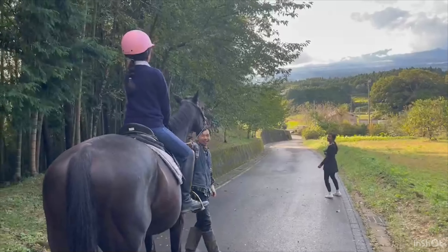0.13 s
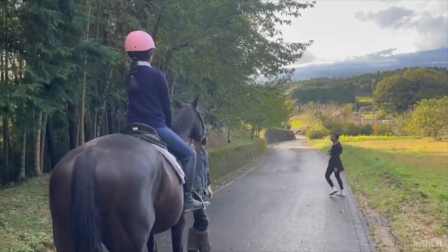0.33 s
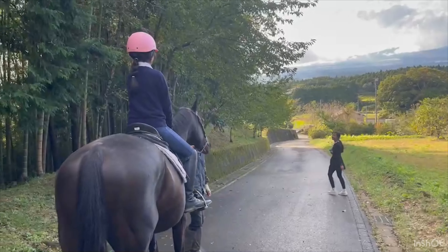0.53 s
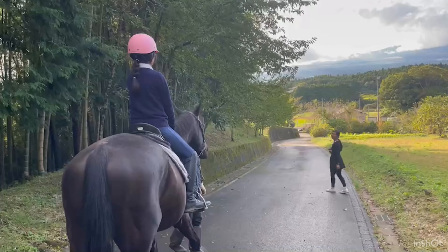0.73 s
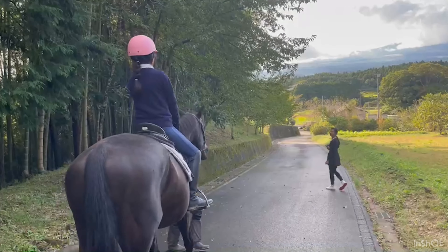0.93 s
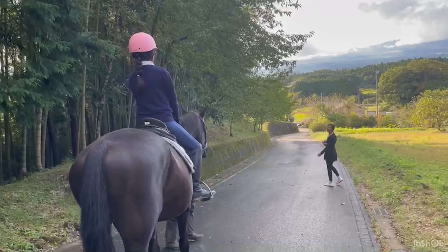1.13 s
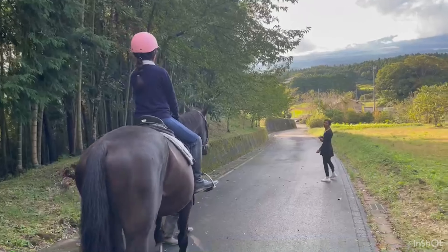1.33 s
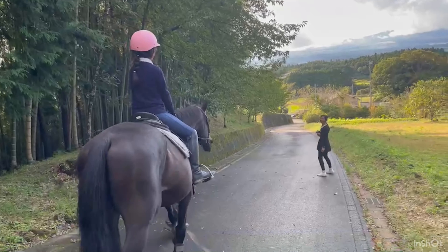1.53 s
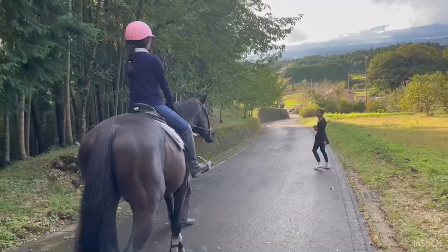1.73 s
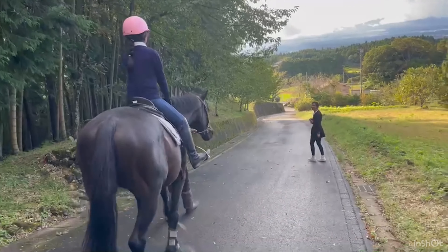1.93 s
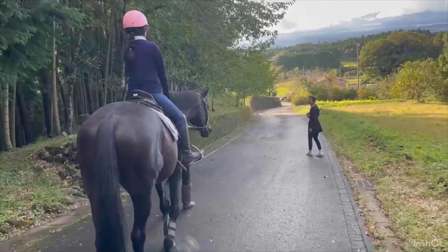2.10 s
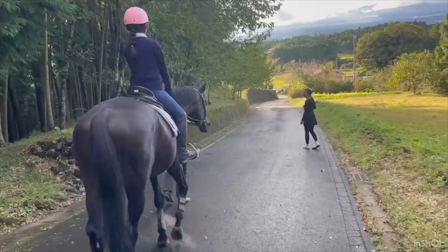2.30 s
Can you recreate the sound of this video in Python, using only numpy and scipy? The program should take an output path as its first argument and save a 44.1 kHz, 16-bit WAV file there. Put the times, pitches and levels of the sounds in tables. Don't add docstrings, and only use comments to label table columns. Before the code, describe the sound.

Shod horse hooves clip-clop at a walk on wet tarmac, with iron ticks and faint birdsong

```python
import sys
import numpy as np
from scipy import signal
from scipy.fft import rfft, irfft
from scipy.io import wavfile
from scipy.ndimage import uniform_filter1d

SR = 44100
rng = np.random.default_rng(int(sys.argv[2]) if len(sys.argv) > 2 else 0)


def master_out(mix):
    frames = np.transpose(np.atleast_2d(mix))
    ceiling = np.clip(frames, -1, 1)
    pcm = np.round(ceiling * 32767).astype(np.int16)
    wavfile.write(sys.argv[1], SR, pcm)


def decibels_to_gain(level_db):
    exponent = np.asarray(level_db, float) / 20
    return 10 ** exponent


N = 104120
HZ = np.fft.rfftfreq(N, 1 / SR)
SPRAY_HZ = 9440


def shape(table):
    hz, value = np.array(table, float).T
    return np.interp(np.log(HZ + 1), np.log(hz), value)


def unit(x):
    return x / np.sqrt(np.mean(x ** 2) + 1e-18)


def band(x, hz, width_hz):
    f = np.fft.rfftfreq(len(x), 1 / SR)
    bell = np.exp(-.5 * ((f - hz) / width_hz) ** 2)
    return irfft(rfft(x) * bell, len(x))


def walk(rate_hz):
    k = int(SR / rate_hz)
    stairs = np.repeat(rng.standard_normal(N // k + 1), k)
    smooth = uniform_filter1d(uniform_filter1d(stairs, k), k)
    return unit(smooth[:N])


def add(out, start_s, x, peak_db):
    i = max(int(start_s * SR), 0)
    x = x[:N - i]
    out[i:i + len(x)] += x * decibels_to_gain(peak_db) / np.max(np.abs(x))


def swell(t, rise_s, fall_s):
    return (1 - np.exp(-t / rise_s)) ** 2 * np.exp(-t / fall_s)


def decay(t, t60_s):
    return np.exp(-np.log(1000) * t / t60_s)


# (frequency [Hz], likeness [0-1])
ALIKE = [(60, .83), (300, .85), (700, .62), (2000, .2), (4500, .6), (6500, .9), (8000, .995), (15000, .995)]


def air(table, flicker_db=1.8, top_hz=14800):
    alike = np.clip(shape(ALIKE), 0, 1)
    noise = rfft(rng.standard_normal((2, N))) * decibels_to_gain(shape(table))
    mid, side = noise * np.sqrt([1 + alike, 1 - alike])
    pair = np.array([mid + side, mid - side]) / np.sqrt(1 + (HZ / top_hz) ** 20)
    out = np.zeros((2, N))
    for hz in 16 * 2. ** np.arange(11):
        octave = np.clip(1 - np.abs(np.log2((HZ + 1) / hz)), 0, 1)
        out += irfft(pair * octave, N) * decibels_to_gain(flicker_db * walk(6.09))
    return unit(out)


# (frequency [Hz], density [dB per Hz])
TRAFFIC = [(26, -19.5), (68, 3.5), (110, -4), (200, -7), (400, -17.5), (1000, -21.5), (5500, -37.5),
           (12500, -53)]


def traffic():
    return decibels_to_gain(-50) * air(TRAFFIC)


# (frequency [Hz], density [dB per Hz])
TREES = [(150, 1.5), (350, -2), (800, 3), (2000, -4), (4000, -18.5), (9000, -33)]
# (time [s], level [dB])
GUST = [
    (0, -87),
    (.55, -58),
    (1.2, -56.5),
    (1.6, -51),
    (1.95, -48),
    (2.36, -50.5),
]


def wind():
    time_s, level_db = np.array(GUST, float).T
    gust_db = np.interp(np.arange(N) / SR, time_s, level_db) - 1
    return decibels_to_gain(gust_db) * air(TREES)


# (time [s], length [s], level [dB], centre [Hz], spray level [dB])
SCUFFS = [
    (-.15, 0.31, -67.5, 5950, -73.5),
    (0.361, 0.033, -54.5, 6130, -54.5),
    (0.453, 0.16, -58.5, 6000, -64.5),
    (0.457, 0.053, -65, 6000, -80),
    (0.886, 0.047, -52.5, 2630, -63.5),
    (1.094, 0.048, -69, 4000, -68),
    (1.222, 0.026, -55.5, 3270, -58.5),
    (1.607, 0.13, -60.5, 2980, -71.5),
    (2.083, 0.046, -54, 2620, -66),
    (2.232, 0.075, -63.5, 3720, -65.5),
]


def scuffs():
    out, t = np.zeros(N), np.arange(N) / SR
    grain_db, slosh_db = 1.5, .5
    grains = rng.standard_normal((2, N)) * decibels_to_gain(grain_db * walk(300) + slosh_db * walk(40.2))
    spray = unit(band(grains[1], SPRAY_HZ, 3700))
    for start_s, length_s, db, hz, spray_db in SCUFFS:
        gate = np.sin(np.pi * np.clip((t - start_s) / length_s, 0, 1)) ** .7
        scrape = unit(band(grains[0], hz, 0.65 * hz))
        out += gate * (decibels_to_gain(db) * scrape + decibels_to_gain(spray_db) * spray)
    return out


def glide(table, voice):
    time_s, hz, db = np.array(table, float).T
    t = np.arange(N) / SR
    edge = np.clip(np.minimum(t - time_s[0], time_s[-1] - t) / 0.0029, 0, 1)
    carrier = np.exp(2j * np.pi * np.cumsum(np.interp(t, time_s, hz)) / SR)
    return np.sqrt(2) * np.real(carrier * voice) * decibels_to_gain(np.interp(t, time_s, db)) * edge


def flutter(hz):
    return (walk(2 * hz) + 1j * walk(2 * hz)) / np.sqrt(2)


# (time [s], pitch [Hz], level [dB])
CRICKET = [
    (0, 4700, -71),
    (.14, 4650, -74),
    (.22, 4660, -82),
]


def cricket():
    upper_ratio, upper_db = 1.245, -4
    upper = np.array(CRICKET) * [1, upper_ratio, 1] + [0, 0, upper_db]
    return glide(CRICKET, flutter(85)) + glide(upper, flutter(130))


# (time [s], pitch [Hz], level [dB])
CHIRP = [
    (.255, 3200, -64),
    (.285, 3560, -63),
    (.315, 3720, -60),
    (.34, 3600, -62),
    (.36, 3000, -63),
]


def chirp():
    return glide(CHIRP, 0.8 + 0.5 * flutter(140))


# (time [s], pitch [Hz], level [dB])
RASP = [
    (1.55, 3200, -66),
    (1.6, 3550, -70),
    (1.64, 4020, -65),
    (1.79, 4050, -68),
    (1.86, 4150, -73),
    (1.92, 4180, -65),
    (2.04, 4260, -60),
    (2.19, 4030, -62),
    (2.215, 3650, -63),
    (2.26, 3380, -65),
]
# (time [s], pitch [Hz], level [dB])
ANSWER = [
    (1.75, 4350, -68),
    (1.85, 4450, -63),
    (1.9, 4500, -74),
    (1.97, 4520, -62),
    (2.06, 4480, -59),
    (2.14, 4320, -65),
]


def rasp():
    wobble, patchy_db, width_hz = .008, 2, 150
    out = np.zeros(N)
    for strand in (RASP, ANSWER):
        waver = np.exp(2j * np.pi * np.cumsum(4000 * wobble * walk(30)) / SR)
        patches = decibels_to_gain(patchy_db * walk(25.24))
        out += glide(strand, flutter(width_hz) * waver * patches)
    return out


# (frequency [Hz], level [dB], T60 [s])
SHOE = [(2350, -10, .01), (3500, -12, .008), (5150, -11, .009), (6700, -18, .006)]
# (time [s], peak [dB], ring [Hz], spray level [dB])
TICKS = [(.351, -46, 3430, -63), (0.446, -56, 6280, -60), (.619, -49, 2700, -64), (0.658, -49.5, 3800, -59),
         (.82, -71, 5000, -68), (0.8401, -68, 5000, -52.5), (.863, -47, 3550, -62),
         (.872, -24.5, 2420, -38.5), (0.874, -25.5, 5250, -53), (.898, -37, 2430, -62),
         (.9025, -36.5, 3520, -62), (.906, -37, 2390, -66), (0.9095, -33.5, 2370, -53),
         (.943, -46, 5140, -54), (0.95, -44, 3730, -54), (1.042, -83, 6000, -78),
         (1.0722, -30, 2540, -38.5), (1.225, -48.5, 4870, -60), (1.2297, -34, 2570, -56),
         (1.246, -48, 4970, -67), (1.263, -68, 6000, -66), (1.327, -24, 2520, -69), (1.328, -40, 4200, -70),
         (1.353, -29.5, 4560, -70), (1.511, -58, 5060, -59.5), (1.5582, -73, 6300, -58),
         (1.625, -59, 6450, -62), (1.6787, -47.5, 6500, -67), (1.7505, -35.5, 5030, -49),
         (1.7866, -27, 5150, -52), (1.845, -70, 5000, -58), (1.905, -40.5, 5250, -64),
         (2.083, -30, 3600, -60), (2.0954, -33.5, 2320, -75), (2.2833, -42, 3580, -63)]


def ticks():
    out, t = np.zeros(N), np.arange(2048) / SR
    ring_t60_s, crack_s, crack_db = 0.0087, 0.0019, -11
    spray_s, spray_crest_db, spray_width_hz = 0.0013, 11.5, 5000
    scatter_db, scatter_ratio = 3, .04
    rattle = decibels_to_gain(-21) * swell(t, 0.003, 0.013)
    for start_s, db, ring_hz, spray_db in TICKS:
        strike, spit, grit = rng.standard_normal((3, len(t)))
        modes = np.sin(2 * np.pi * ring_hz * t) * decay(t, ring_t60_s)
        for hz, mode_db, t60_s in SHOE:
            level_draw, pitch_draw = rng.standard_normal(2)
            mode_hz = hz * (1 + scatter_ratio * pitch_draw)
            mode = np.sin(2 * np.pi * mode_hz * t) * decay(t, t60_s)
            modes += decibels_to_gain(mode_db + scatter_db * level_draw) * mode
        shoe = np.convolve(strike * swell(t, 0.000074, crack_s), modes)[:len(t)]
        crack = unit(band(grit, 1400, 3500)) * (swell(t, .0001, crack_s) + rattle)
        add(out, start_s, shoe / np.max(np.abs(shoe)) + decibels_to_gain(crack_db) * crack, db)
        spray = band(spit, SPRAY_HZ, spray_width_hz) * (swell(t, .0001, spray_s) + rattle)
        add(out, start_s, spray, spray_db + spray_crest_db)
    return out


# (time [s], peak [dB], pitch [Hz], fall [s])
CLOPS = [(.455, -47, 730, 0.0026), (.458, -45.5, 1042, 0.0048), (.8705, -22.5, 770, 0.0023),
         (.873, -18, 1023, 0.0024), (.884, -40, 1040, .003), (.895, -31.5, 686, 0.003),
         (.899, -32.5, 1130, 0.004), (.902, -29.5, 690, 0.003), (.909, -27, 981, 0.0045),
         (.915, -39, 977, 0.0049), (.942, -39, 1270, 0.00094), (.948, -35, 1010, 0.0011),
         (.957, -39.5, 786, 0.003), (1.0725, -40, 1057, 0.0027), (1.073, -32.5, 726, .002),
         (1.2235, -40, 706, 0.0012), (1.2305, -26, 896, 0.00078), (1.237, -40.5, 1096, 0.0027),
         (1.244, -42.5, 1020, 0.0015), (1.326, -20.5, 763, 0.0021), (1.3277, -12, 1065, .0016),
         (1.3335, -32, 1046, 0.0044), (1.351, -25, 1070, 0.0018), (1.353, -15.5, 684, 0.0012),
         (1.358, -26.5, 780, 0.0015), (1.369, -51, 650, .002), (1.633, -38, 1120, 0.0016),
         (1.646, -38, 1040, 0.0024), (1.654, -28.5, 736, 0.0016), (1.657, -27, 905, 0.0015),
         (1.661, -24, 761, 0.0017), (1.673, -22, 714, 0.0018), (1.677, -35, 1290, 0.003),
         (1.7, -38, 717, 0.0027), (1.729, -41.5, 620, 0.006), (1.749, -22, 1182, 0.0011),
         (1.785, -27.5, 895, 0.0012), (1.788, -29, 560, 0.003), (1.791, -31.5, 810, 0.0019),
         (2.083, -22, 760, 0.0017), (2.086, -23.5, 994, 0.0028), (2.0945, -23.5, 723, .003),
         (2.098, -28, 1090, .002), (2.106, -30, 630, 0.0013), (2.11, -27, 800, 0.0016),
         (2.115, -34, 825, 0.0014)]


def clops():
    out, t = np.zeros(N), np.arange(2048) / SR
    lead_s, rise_s = .0009, 0.0013
    lower_ratio, lower_db = 0.565, -11.5
    rough, rough_hz = .22, 320
    for start_s, db, hz, fall_s in CLOPS:
        tone = np.sin(2 * np.pi * hz * t)
        tone += decibels_to_gain(lower_db) * np.sin(2 * np.pi * lower_ratio * hz * t)
        grit = unit(band(rng.standard_normal(len(t)), hz, rough_hz))
        envelope = swell(t, rise_s, 2 * fall_s) ** 2
        add(out, start_s - lead_s, (tone + rough * grit) * envelope, db)
    return out


# (time [s], peak [dB], pitch [Hz])
THUDS = [(.46, -44.5, 171), (0.8742, -25.5, 337), (0.884, -34, 190), (0.91, -44, 179), (.917, -45, 209),
         (.95, -42.5, 283), (.959, -42.5, 273), (1.232, -47, 298), (1.329, -26.5, 243), (1.336, -36.5, 292),
         (1.354, -28, 375), (1.359, -32, 175), (1.369, -39, 128), (1.635, -43, 275), (1.663, -37, 288),
         (1.675, -35, 207), (1.681, -33, 256), (1.752, -25.5, 239), (1.788, -26, 258), (1.857, -37, 226),
         (2.087, -34, 306), (2.097, -38, 267), (2.111, -34, 222)]


def thuds():
    out, t = np.zeros(N), np.arange(2048) / SR
    sag, sag_s, rise_s, fall_s = .4, .003, 0.0037, 0.0028
    for start_s, db, hz in THUDS:
        cycles = hz * (t + sag * sag_s * (1 - np.exp(-t / sag_s)))
        add(out, start_s, np.sin(2 * np.pi * cycles) * swell(t, rise_s, fall_s), db)
    return out


# (time [s], peak [dB], pitch [Hz])
CHINKS = [
    (.82, -63, 12100),
    (.828, -58, 12200),
    (0.84, -48, 11900),
    (.864, -56, 12000),
    (.874, -51, 11800),
    (.903, -54, 11900),
    (.943, -52, 12100),
    (.95, -57, 11900),
]


def bridle():
    out, t = np.zeros(N), np.arange(2048) / SR
    t60_s = 0.016
    for start_s, db, hz in CHINKS:
        add(out, start_s, np.sin(2 * np.pi * hz * t) * swell(t, 0.00016, t60_s / np.log(1000)), db)
    return out


def echo(x, top_hz, t60_s):
    t = np.arange(16384) / SR
    sides = []
    for _ in range(2):
        tail = band(rng.standard_normal(len(t)), 0, top_hz) * decay(t, t60_s) * (t > .004)
        tail /= np.sqrt(np.sum(tail ** 2))
        sides.append(signal.fftconvolve(x, tail)[:N])
    return np.array(sides)


# (frequency [Hz], difference [dB])
LEFT_DB = [(100, 1), (400, 2), (1200, 6), (5000, 6), (6800, 2), (7800, 0), (15000, 0)]


def scene():
    horse = clops() + thuds() + ticks() + scuffs() + bridle()
    song = cricket() + chirp() + rasp()
    halves = np.array([[.5], [-.5]])
    near = irfft(rfft(horse + song) * decibels_to_gain(halves * shape(LEFT_DB)), N)
    verge = decibels_to_gain(-24) * echo(horse, top_hz=3000, t60_s=.2)
    woods = decibels_to_gain(-9) * echo(song, top_hz=6000, t60_s=.35)
    far_left_db = 1.06
    far = (traffic() + wind()) * decibels_to_gain(halves * far_left_db)
    return near + verge + woods + far


# (frequency [Hz], lead [rad])
PORTS = [(100, 0), (2800, -.9), (4200, -.2), (5800, -.2), (6500, .9), (7500, 2.6), (8300, 3.1), (9200, 3.6),
         (10300, 5.6), (11400, 6.3), (12600, 6.8), (13500, 8.2), (14500, 8.8), (15800, 9.3)]


def low_pass(x):
    return signal.sosfilt(signal.butter(12, 16440, fs=SR, output="sos"), x)


def record(dry):
    top_hz = 15900
    phase = np.exp(1j * np.array([[-.5], [.5]]) * shape(PORTS))
    ports = phase / (1 + (HZ / top_hz) ** 60)
    mix = irfft(rfft(dry) * ports, N)
    return low_pass(mix)


dry = scene()
out = record(dry)
master_out(out)
```